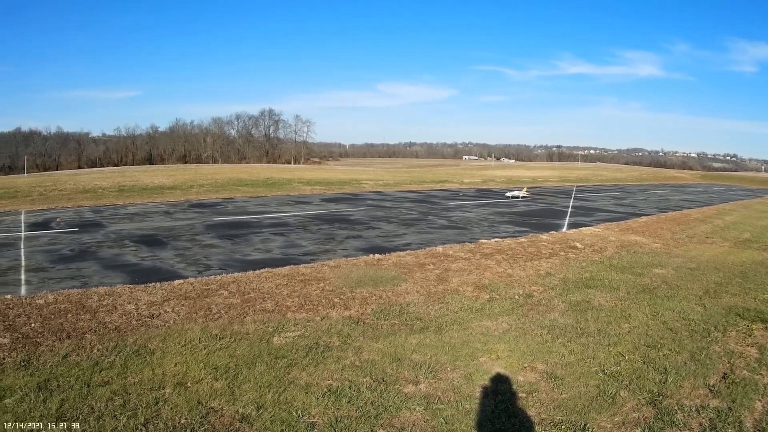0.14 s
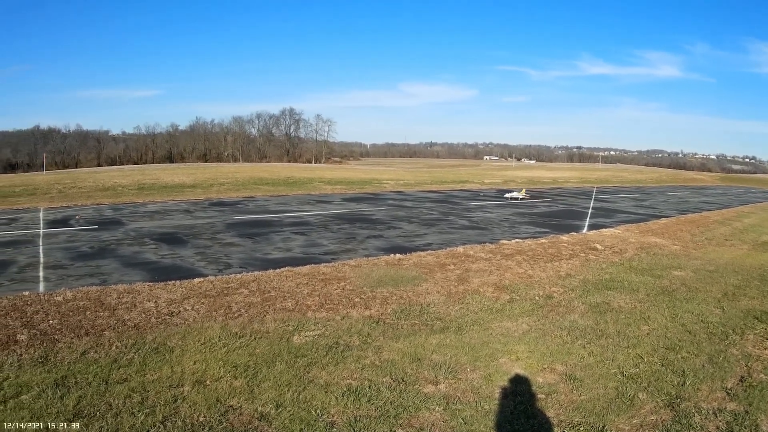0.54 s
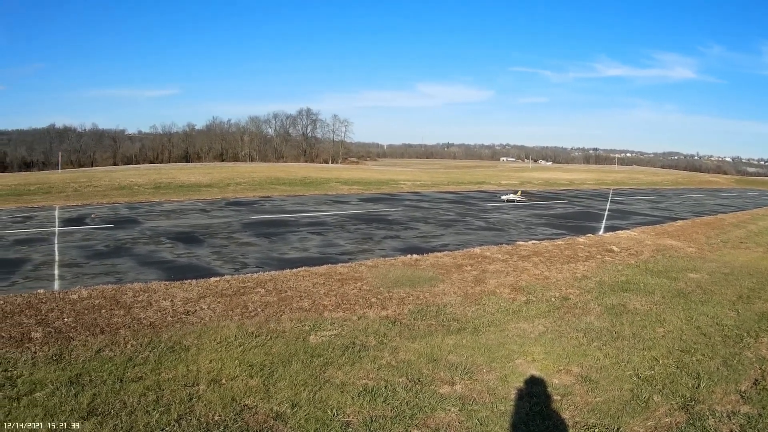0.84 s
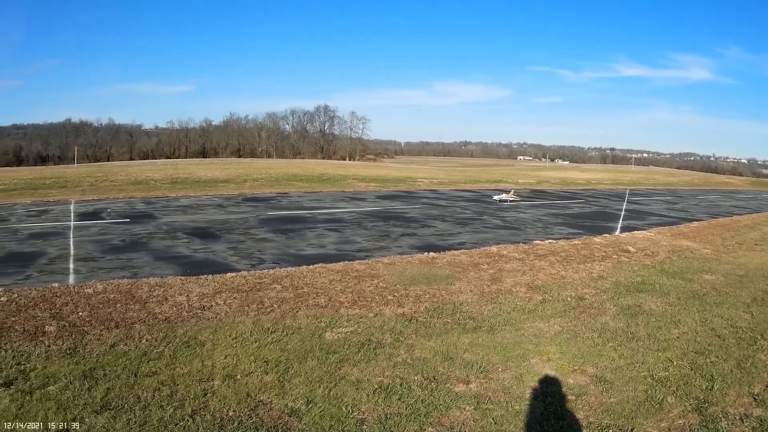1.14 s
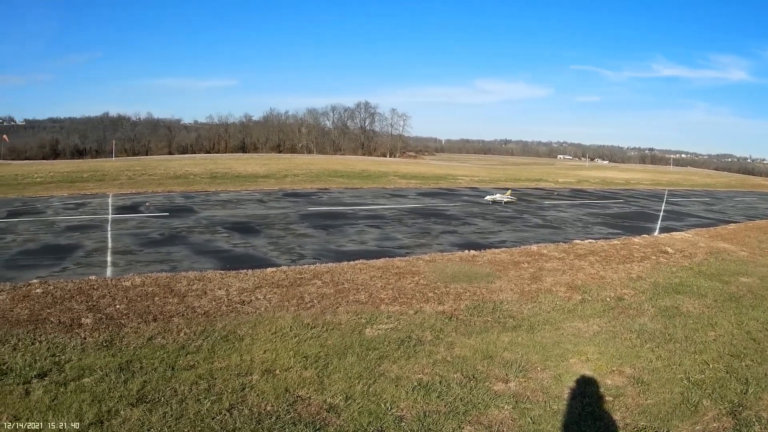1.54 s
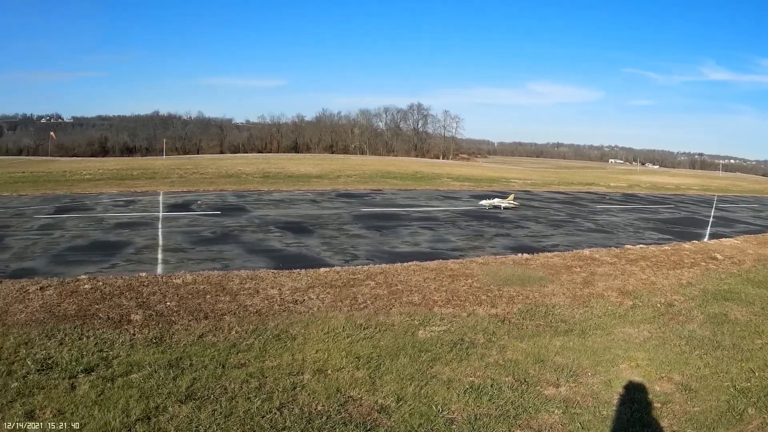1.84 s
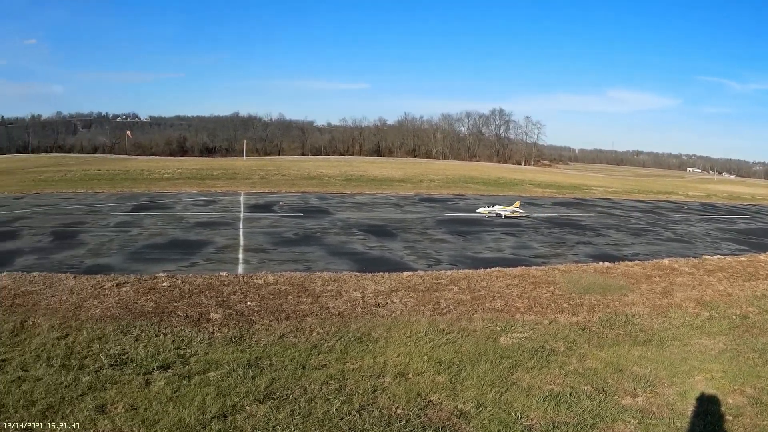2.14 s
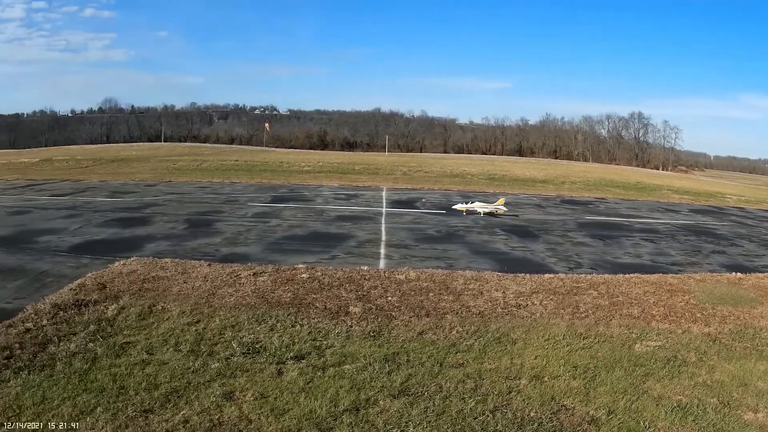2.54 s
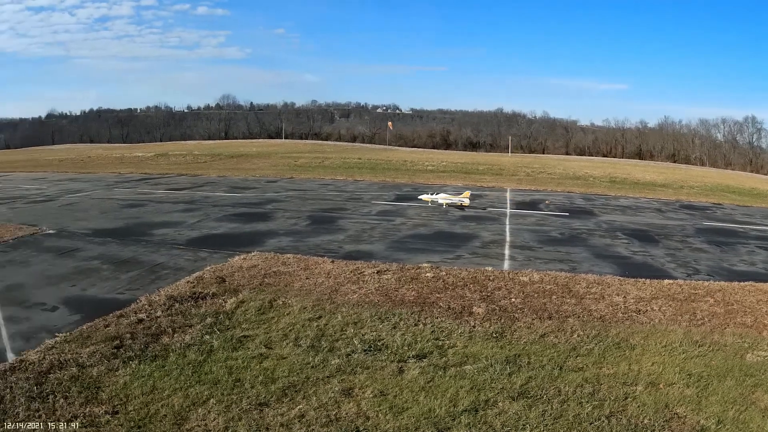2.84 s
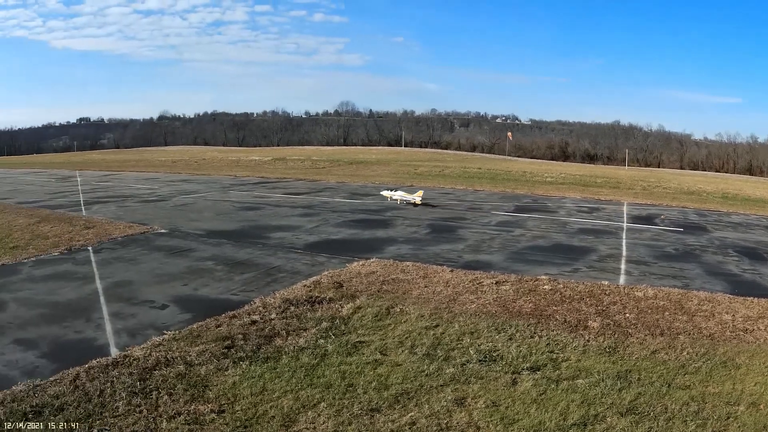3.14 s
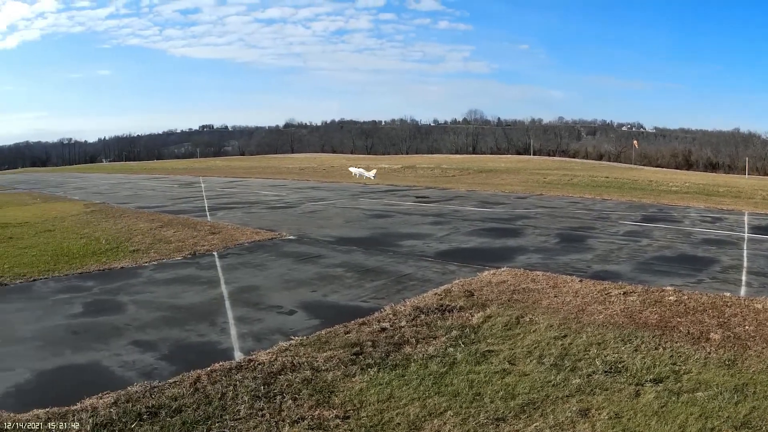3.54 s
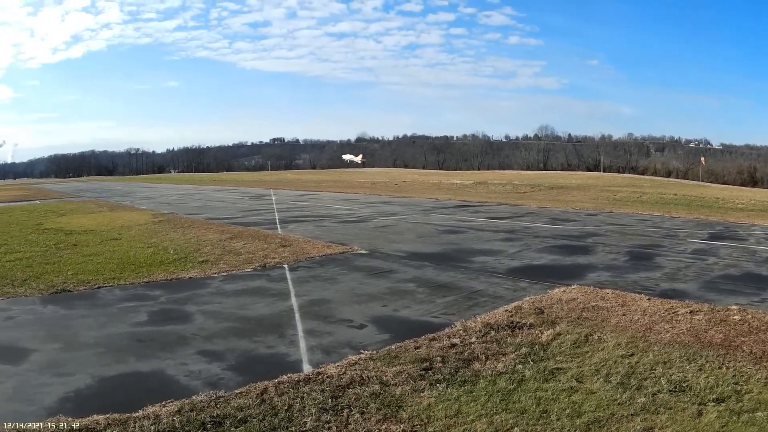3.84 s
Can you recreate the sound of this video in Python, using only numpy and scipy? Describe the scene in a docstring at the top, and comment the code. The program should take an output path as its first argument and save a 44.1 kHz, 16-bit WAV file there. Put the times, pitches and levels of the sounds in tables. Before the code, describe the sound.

Model jet takes off, its high fan whine climbing over a swelling airy roar as it passes.

```python
"""A fan's whine climbs in throttle steps over a swelling rush as a small electric ducted-fan jet takes off
from a paved runway, passing an onlooker a little before 3 s; light wind rumbles on the microphone.
The whine is three blade-passing harmonics; roar, hiss, duct resonances and wind are filtered noise.
An echo from the pavement interferes with the rush: as the jet lifts off the echo lags more, and the
interference sweeps downward. At five instants the sound thins to two hollow tones."""
import sys
import numpy as np
from scipy import signal
from scipy.io import wavfile
from scipy.ndimage import uniform_filter1d

SR = 44100
rng = np.random.default_rng(int(sys.argv[2]) if len(sys.argv) > 2 else 0)


def log_audio(samples):
    """Write samples as a 16-bit WAV file to the path given in sys.argv[1]."""
    # one column per channel
    frames = np.atleast_2d(samples).T
    # limit to full scale, then quantise
    limited = np.clip(frames, -1, 1)
    pcm = np.round(limited * 32767).astype(np.int16)
    wavfile.write(sys.argv[1], SR, pcm)


N = 176400
TIME = np.arange(N) / SR
FRAME, HOP = 2048, 512  # samples
FRAME_S = np.arange(N // HOP + 5) * HOP / SR
BIN_HZ = np.fft.rfftfreq(FRAME, 1 / SR)
BOUNCE = 0.6  # amplitude reflection of the pavement at low frequency

# Turn from nose-on to tail-on: time_s, roar_tail_share, hiss_tail_share (shares 0-1)
ASPECT = [(0, 0.1, 0.29), (1.4, 0.3, 0), (2.3, 0, 0.28), (2.7, 0.75, 0.51), (3.05, 0.96, 0.52),
          (3.45, 0.7, 1), (4, 0.5, 1)]


def amp(db):
    """Decibel law: 20 dB is a factor of ten in amplitude."""
    return 10 ** (np.asarray(db) / 20)


def unit(x):
    """Normalisation to a root-mean-square amplitude of 1."""
    return x / np.sqrt(np.mean(x ** 2) + 1e-20)


def curve(table, at, axis=1):
    """Linear interpolation of one table column against the first."""
    rows = np.array(table, float)
    return np.interp(at, rows[:, 0], rows[:, axis])


def colour(table, axis=1, skirt_db_per_octave=38):
    """Spectral envelope in dB, linear in octaves, with a constant slope beyond its ends."""
    rows = np.array(table, float)
    octave = np.log2(BIN_HZ + 1)  # 1 Hz keeps the zero bin finite
    knots = np.log2(rows[:, 0])
    beyond = abs(octave - np.clip(octave, knots[0], knots[-1]))
    return np.interp(octave, knots, rows[:, axis]) - skirt_db_per_octave * beyond


def drift(at, slow_hz, fast_hz):
    """Random modulation of rms 1: slow sinusoids of random phase, the slower ones stronger."""
    rates = np.geomspace(slow_hz, fast_hz, num=24)
    return unit(sum(np.sin(2 * np.pi * (f * at + rng.random())) / np.sqrt(f) for f in rates))


def levelled(shape, level_db):
    """Separation of colour from level: each frame's spectrum is scaled to the given rms."""
    rms = np.sqrt(np.mean(shape ** 2, axis=-1, keepdims=True))
    return shape / rms * amp(level_db)[:, None]


def play(frames):
    """Inverse short-time Fourier synthesis by overlap-add."""
    return signal.istft(frames.T, nperseg=FRAME, noverlap=FRAME - HOP)[1][:N]


def noise(gain, patchy_db, flutter_db):
    """Turbulence as Gaussian noise, modulated in time-frequency patches and a common flutter."""
    real, imaginary, patches = rng.standard_normal((3, len(FRAME_S), len(BIN_HZ)))
    patches = uniform_filter1d(patches, size=8, axis=0)  # smooth over frames
    patches = unit(uniform_filter1d(patches, size=9, axis=1))  # smooth over bins
    flutter = drift(FRAME_S, 4, 30)[:, None]
    spectrum = (real + 1j * imaginary) * amp(patchy_db * patches + flutter_db * flutter)
    return play(spectrum * gain) / np.std(play(spectrum))


def pavement():
    """Two-path interference: the lag of the ground echo grows with source height over distance."""
    # Flight path: time_s, distance_m, height_m
    flight_path = [(0, 31, 0.13), (1, 19.1, 0.18), (2, 17.4, .16), (2.5, 12, .16), (2.9, 13.5, .16),
                   (3.3, 17.7, 0.17), (3.45, 16.3, 0.34), (3.65, 16.7, 0.52), (3.85, 23, 1.36),
                   (4, 22.9, 1.9)]
    mic_height_m, bounce_hz, sound_m_per_s = 1.654, 4400, 343
    height_m = curve(flight_path, FRAME_S, axis=2)
    distance_m = curve(flight_path, FRAME_S)
    lag_s = 2 * mic_height_m * height_m / distance_m / sound_m_per_s
    bounce = BOUNCE / (1 + (BIN_HZ / bounce_hz) ** 2)  # the pavement reflects treble less
    return abs(1 + bounce * np.exp(-2j * np.pi * BIN_HZ * lag_s[:, None]))


def turning(table, tail_share):
    """Source directivity: the nose-on spectrum blends, in dB, with the tail-on one."""
    share = np.clip(tail_share, 0, 1)[:, None]
    return amp((1 - share) * colour(table) + share * colour(table, axis=2))


def exhaust():
    """Jet noise: turbulence of the exhaust, heard as a hollow roar with directional colour."""
    # Roar before the pavement echo: time_s, level_db
    roar_level = [(0.0, -56), (0.1, -56), (0.3, -59), (0.6, -52), (0.9, -50.5), (1.0, -50), (1.2, -49.5),
                  (1.4, -40.5), (1.9, -37.6), (2.0, -39.5), (2.2, -37.5), (2.5, -33.2), (2.6, -32.1),
                  (2.9, -35), (3.0, -30.5), (3.4, -33), (3.6, -34), (3.7, -35.5), (3.9, -38), (4.0, -35)]
    # Relative roar spectrum: frequency_hz, nose_on_db, tail_on_db
    roar_colour = [(169, -20, -20.5), (264, -15.5, -23), (450, -4, -14.5), (530, -5, -11),
                   (603, -7.5, -8.0), (660, 0.5, -7), (840, 2, 2), (845, -5.5, -5), (960, -9.5, 0.5),
                   (1080, -6, -3), (1204, -10.5, -17.5), (1360, -12, -6.5), (1585, -17.5, -5.5),
                   (1753, -20.5, -22.0), (1970, -25.5, -19.5)]
    shape = turning(roar_colour, curve(ASPECT, FRAME_S))
    gain = levelled(shape, curve(roar_level, FRAME_S))
    return noise(gain * pavement(), patchy_db=2.0, flutter_db=0.45)


def duct_hiss():
    """Broadband blade noise: air torn by the blades, its upper mids and treble levelled apart."""
    # Hiss before the pavement echo: time_s, upper_mids_db, treble_db
    hiss_level = [(0.0, -61, -60.5), (0.33, -58, -58.5), (0.65, -54, -52), (1.3, -47.5, -49.5),
                  (1.42, -42, -42.5), (1.83, -40.5, -39.58), (1.95, -41, -44), (2.14, -41, -41.5),
                  (2.48, -35.5, -36.5), (2.62, -37.26, -37.5), (3.32, -34, -28.5), (3.46, -34, -30.5),
                  (3.58, -35, -28.83), (3.78, -37, -33.5), (3.83, -34.5, -29), (4.01, -37.5, -35.5)]
    # Relative hiss spectrum: frequency_hz, nose_on_db, tail_on_db
    hiss_colour = [(1900, -12.5, -17.5), (2050, -21.5, -23), (2413, -5, -12.5), (3030, -4.0, -7.5),
                   (4040, -5.5, -12.5), (4953.0, -1.5, -6.0), (5820, -1, -7), (5970, -8.5, -11.0),
                   (6280, -15.5, -14.5), (6660, -26, -12.0), (6950, -18.5, -16.0), (7400, -12.5, -18.5),
                   (7830, -12.5, -11.5), (8160, -25, -25), (8450, -13, -17.0), (9160, -3, 0), (9240, 2, -4),
                   (9940, -9, -8.5), (11200, -15.5, 2), (11230, -21.0, -12), (11600, -17.0, -3),
                   (11890, -5, -15), (12016.0, -5.5, 1), (12600, -16, -9), (13100, -20, -10.0),
                   (12791.0, -18, -14), (12900, -5, -7.5), (13700, -8.5, -1), (14255.0, -14, -13.0),
                   (14772.0, -19, -17), (15116.0, -20, -16), (15590.0, -31.0, -20)]
    split_hz = 6640
    shape = turning(hiss_colour, curve(ASPECT, FRAME_S, axis=2))
    treble = BIN_HZ > split_hz
    upper_mids_gain = levelled(shape * ~treble, curve(hiss_level, FRAME_S))
    treble_gain = levelled(shape * treble, curve(hiss_level, FRAME_S, axis=2))
    return noise((upper_mids_gain + treble_gain) * pavement(), patchy_db=1.57, flutter_db=1.05)


def duct_ring():
    """Resonance: noise shaped by duct modes, whose balance changes as the tail turns to the listener."""
    # Relative modes heard from ahead: frequency_hz, half_width_hz, strength_db
    modes_ahead = [(281, 44, -12), (425, 43, -5.5), (656, 16, -5), (754, 48, -0.5), (1077, 65, -6),
                   (3030, 530, -0.5)]
    # Relative modes heard from the side and behind: frequency_hz, half_width_hz, strength_db
    modes_behind = [(410, 21, -10), (624, 19.4, -0.5), (765, 59, -4.5), (992, 29, 1), (1460, 26, -9.5)]
    # Ring level before the pavement factor: time_s, ahead_db, behind_db
    ring_level = [(0, -50.5, -80), (.35, -48.5, -83), (.7, -43.5, -75), (1.2, -42, -68), (1.45, -38, -48),
                  (1.85, -44.5, -49), (2.2, -42.5, -36), (2.55, -37, -36.5), (2.85, -45.5, -37),
                  (3.08, -52, -31.5), (3.25, -58, -35), (3.55, -60, -31), (3.8, -65, -34), (4, -70, -42)]
    power = 0
    for axis, modes in enumerate([modes_ahead, modes_behind], start=1):
        shape = 0
        for hz, width, db in modes:
            shape = shape + amp(db) / np.sqrt(width) / (1 + ((BIN_HZ - hz) / width) ** 2)
        power = power + levelled(shape, curve(ring_level, FRAME_S, axis=axis)) ** 2
    echo = pavement() / (1 + BOUNCE)  # full reinforcement counts as 1
    return noise(np.sqrt(power) * echo, patchy_db=1.5, flutter_db=-0.13)


def whine(jitter=0.0013, flicker_db=2.0, fuzz=0.16, fuzz_hz=60):
    """Blade-passing harmonics, wavering in the air, with turbulent sidebands that grow with order."""
    # Fan pitch: time_s, blade_passing_hz
    fan_pitch = [(0.0, 3185.0), (0.2, 3242.5), (0.3, 3478.0), (0.44, 3708.0), (0.75, 3794.0), (1.0, 3835.5),
                 (1.17, 3915.5), (1.24, 4100.0), (1.29, 4283.0), (1.36, 4460.0), (1.75, 4468.0),
                 (2.0, 4490.5), (2.2, 4598.0), (2.33, 4895.5), (2.44, 5376.0), (2.65, 5372.5),
                 (2.87, 5369.0), (3.0, 5540.5), (3.1, 5552.5), (3.25, 5500.0), (3.5, 5435.0),
                 (3.75, 5380.0), (4.0, 5345.5)]
    # Harmonics before the mix gain: time_s, first_db, second_db, third_db
    harmonic_level = [(0.0, -59, -77, -62), (0.2, -55.5, -94.0, -81.2), (0.3, -61, -77, -65.0),
                      (0.4, -54.5, -79, -75.0), (0.6, -76, -77.0, -84.7), (0.7, -71, -74, -79.2),
                      (0.8, -63, -62, -85.4), (1.0, -55.5, -61, -83.8), (1.1, -63, -63.0, -74.0),
                      (1.2, -56, -66.0, -70.0), (1.2, -69.0, -85, -56.0), (1.3, -51, -53, -75),
                      (1.4, -69, -51.0, -43), (1.7, -59, -50.0, -51.5), (1.8, -47.5, -44, -43),
                      (2.0, -46, -45, -51), (2.0, -55, -53, -50.5), (2.1, -46.5, -37, -46),
                      (2.3, -50, -58.0, -49), (2.4, -34, -58.3, -71.0), (2.4, -33.5, -42, -61),
                      (2.6, -38, -50.0, -63), (2.8, -41, -50.0, -69.0), (2.9, -33, -52, -69.0),
                      (3.0, -39.5, -39.6, -56), (3.0, -34, -37.5, -69.0), (3.2, -41, -32.5, -69.0),
                      (3.3, -35, -30.0, -69.0), (3.4, -33, -35.5, -69.0), (3.5, -41.8, -34, -69.0),
                      (3.5, -35, -32, -69.0), (3.7, -38, -34, -69.0), (3.8, -36.5, -37.0, -69.0),
                      (3.9, -39.5, -32.5, -69.0), (4.0, -32.5, -39, -69.0)]
    # Brief fades of the first harmonic: centre_s, half_length_s, depth_db
    fades = [(3.118, 0.022, -8), (3.188, 0.022, -10), (3.316, 0.023, -14), (3.47, .02, -12),
             (3.775, .025, -10)]
    pitch_hz = curve(fan_pitch, TIME) * (1 + jitter * drift(TIME, 6, 90))
    phase = 2 * np.pi * np.cumsum(pitch_hz) / SR
    smooth = signal.butter(2, fuzz_hz, fs=SR, output="sos")
    fade_db = sum(db * np.exp(-((TIME - s) / half) ** 2) for s, half, db in fades)
    out = np.zeros(N)
    for k in range(1, len(harmonic_level[0])):
        slow_noise = unit(signal.sosfilt(smooth, rng.standard_normal((2, N))))
        in_phase, quadrature = fuzz * np.sqrt(k) * slow_noise
        tone = (np.sqrt(2) + in_phase) * np.cos(k * phase) + quadrature * np.sin(k * phase)
        flickering = unit(tone * amp(flicker_db * drift(TIME, 6, 25)))
        level_db = curve(harmonic_level, TIME, axis=k) + (k == 1) * fade_db
        out += flickering * amp(level_db)
    return out


def wind():
    """Wind noise: low-frequency turbulence at the microphone, in lumpy gusts."""
    # Wind rumble: time_s, level_db
    wind_level = [(0.0, -58), (0.04, -46), (0.08, -54.5), (0.75, -53.5), (1.08, -63.5), (1.47, -56.5),
                  (1.69, -61.5), (3.13, -55), (3.16, -49), (3.79, -54.5), (3.84, -45), (3.92, -62),
                  (3.97, -36), (4.0, -45)]
    # Relative wind spectrum: frequency_hz, strength_db
    wind_colour = [(15, -9), (35, -1.5), (70, -1), (110, -2.5), (150, -6.5), (300, -14), (800, -48)]
    gain = levelled(amp(colour(wind_colour)), curve(wind_level, FRAME_S))
    return noise(gain, patchy_db=0.5, flutter_db=1.0)


def thinned(sound, dip_db=-15, tone_stretch=1.16, spread_hz=60):
    """Brief thinnings: as the sound dips, two clusters of three close sines make short, rough, hollow tones."""
    # Thinnings: centre_s, half_length_s, low_hz, low_db, high_hz, high_db
    thinnings = [(1.287, 0.0074, 720, -36.5, 4290, -51), (1.898, 0.011, 728, -28.5, 1550, -42),
                 (2.135, 0.0058, 1022, -33, 4600, -67), (3.882, 0.011, 1370, -39.5, 13400, -32),
                 (3.924, 0.0082, 1004, -33.5, 13200, -40)]
    for s, half, low_hz, low_db, high_hz, high_db in thinnings:
        u = (TIME - s) / half
        sound = sound * amp(dip_db * np.exp(-u ** 2))
        for hz, db in (low_hz, low_db), (high_hz, high_db):
            cluster = 0
            for offset_hz in (-spread_hz, 0, spread_hz):
                cluster = cluster + np.sin(2 * np.pi * ((hz + offset_hz) * TIME + rng.random()))
            # the tones outlast the dip by tone_stretch
            sound = sound + amp(db) * unit(cluster) * np.exp(-(u / tone_stretch) ** 2)
    return sound


def scene(whine_db=0.5):
    """Superposition in mono: the thinnings act on the noises, and the whine is added untouched."""
    rush = exhaust() + duct_hiss() + duct_ring() + wind()
    return (thinned(rush) + amp(whine_db) * whine())[None]


def record(dry, cutoff_hz=15700):
    """Band limitation by a linear-phase low-pass filter."""
    lowpass = signal.firwin(1023, cutoff_hz, window=("kaiser", 9), fs=SR)
    return signal.oaconvolve(dry, lowpass[None], "same")


dry = scene()
out = record(dry)
log_audio(out)
```